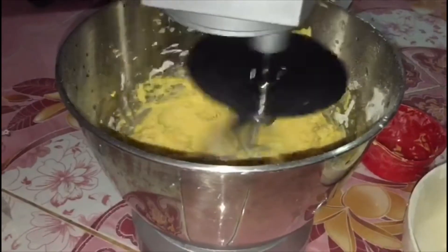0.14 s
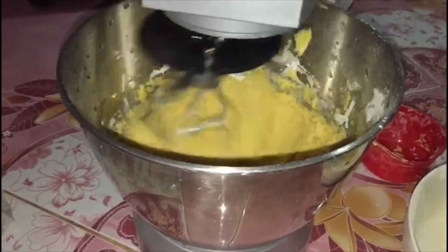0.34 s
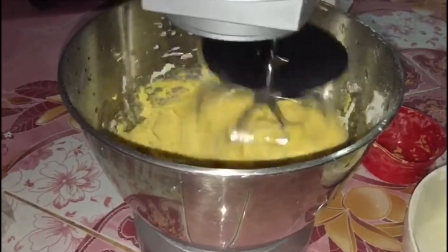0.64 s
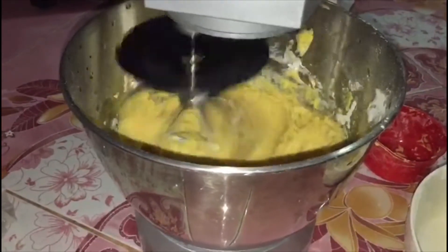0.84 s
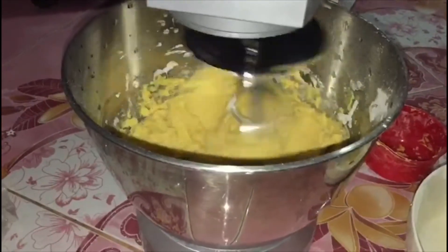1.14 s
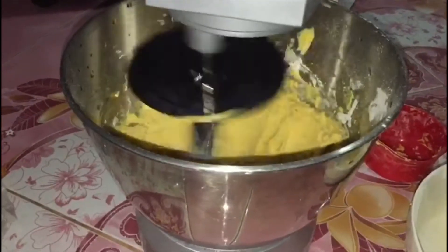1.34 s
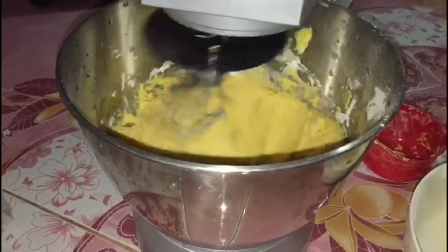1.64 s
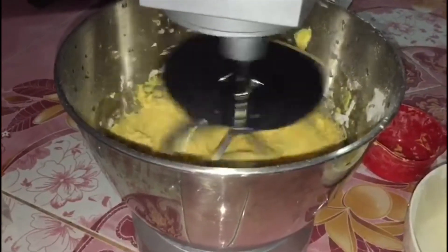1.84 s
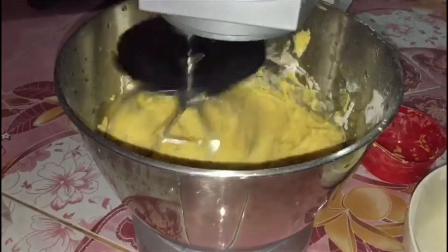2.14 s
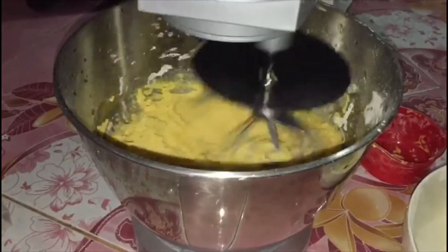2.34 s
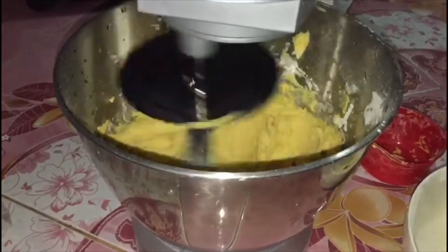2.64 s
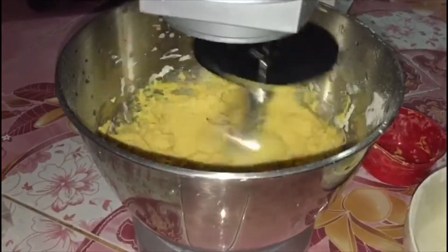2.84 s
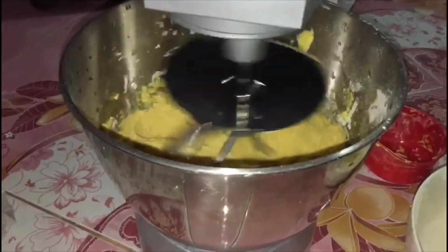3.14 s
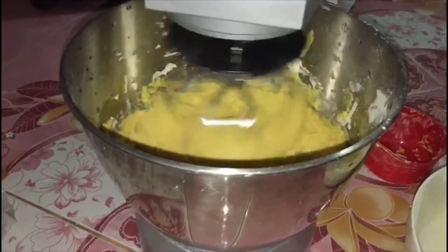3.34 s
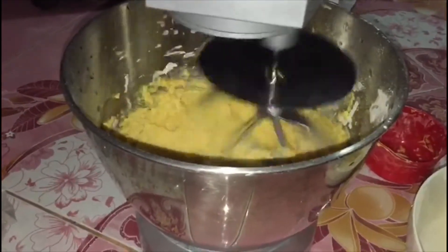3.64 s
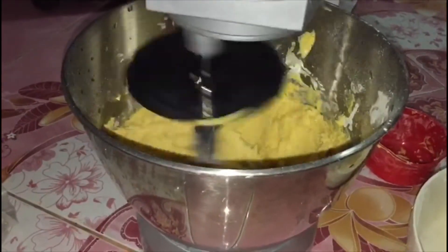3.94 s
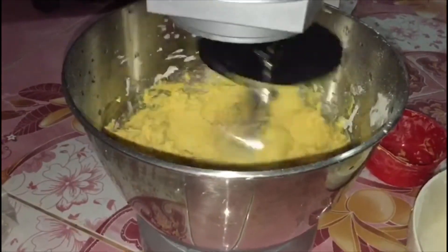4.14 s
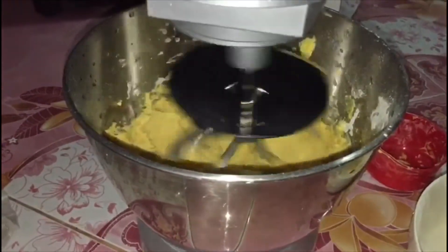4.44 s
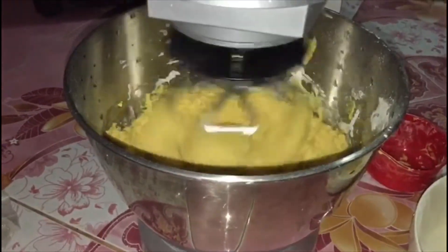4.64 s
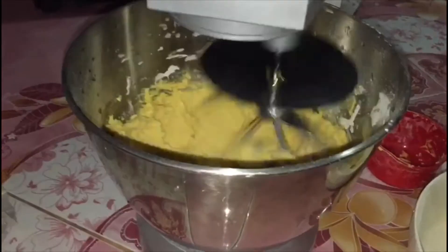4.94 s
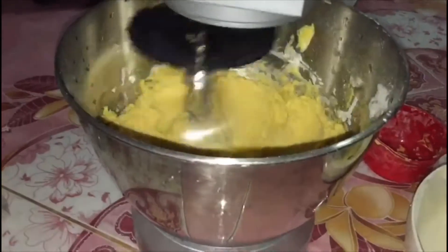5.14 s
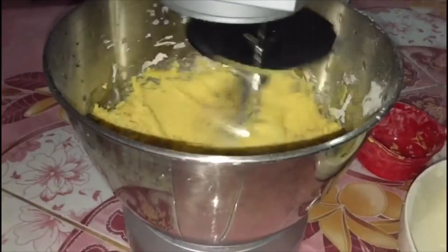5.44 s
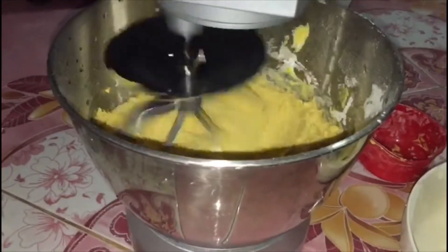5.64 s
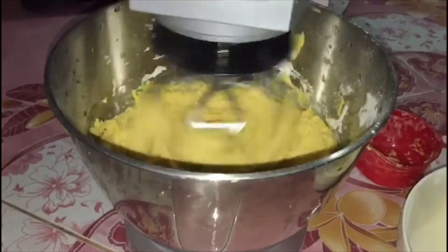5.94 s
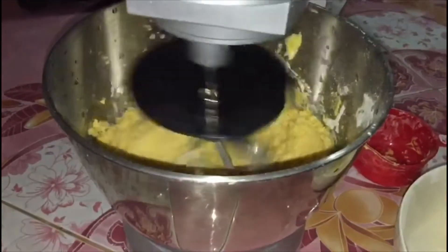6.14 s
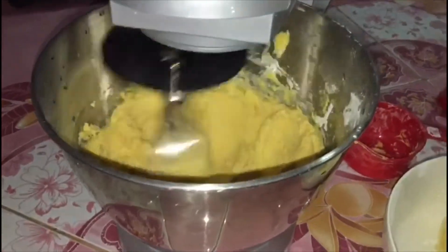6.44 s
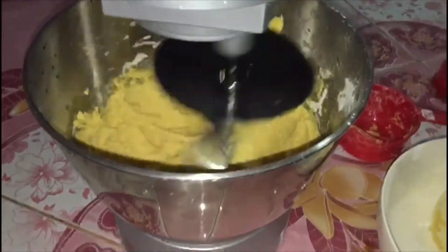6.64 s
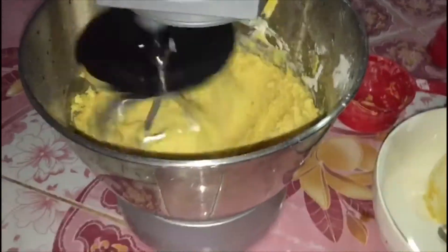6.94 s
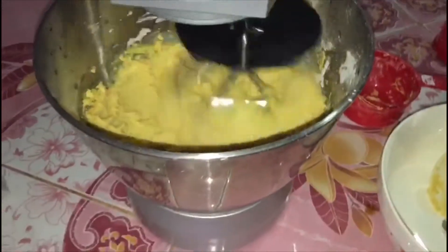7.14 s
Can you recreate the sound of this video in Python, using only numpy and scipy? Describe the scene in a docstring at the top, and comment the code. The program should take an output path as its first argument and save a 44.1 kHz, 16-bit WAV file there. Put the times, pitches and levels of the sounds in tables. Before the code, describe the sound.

Close up in a kitchen, a stand mixer beats dough with a wavering motor whine, gear chatter and pulsing hiss.

```python
"""A stand mixer works soft dough in a steel bowl, heard close up in a kitchen. Its motor whines at multiples of
the shaft speed and creeps faster; its armature and gears rattle the housing and bowl. Brushes and fan hiss,
swelling with each spin of the beater and each orbit (its trip round the bowl). The dough smacks faintly, the
table rumbles, and now and then one tone flares with a metallic ring."""
import sys
import numpy as np
from scipy import signal
from scipy.fft import rfft, irfft, next_fast_len
from scipy.io import wavfile

SR = 44100
rng = np.random.default_rng(int(sys.argv[2]) if len(sys.argv) > 2 else 0)


def waveform_to_disk(signal):
    """Save audio, clipped to [-1, 1], as 16-bit WAV at the path in sys.argv[1]."""
    frames = np.transpose(np.atleast_2d(signal))
    scaled = np.clip(frames, -1, 1) * 32767
    samples = np.round(scaled).astype(np.int16)
    wavfile.write(sys.argv[1], SR, samples)


N = 321930
TIME = np.arange(N) / SR  # seconds
GEAR_RATIO, SPIN_RATIO, ORBIT_RATIO = 0.30585, 0.0678, 0.01202  # turns per turn of the motor shaft


def gain(db):
    """Turn decibels into a number to multiply by."""
    return np.exp(np.asarray(db) * (np.log(10) / 20))


def set_level(x, db):
    """Scale a sound to this average (rms) level."""
    return x * gain(db) / np.sqrt(np.mean(x ** 2))


def wander(rate_hz, size=1024):
    """A smooth random curve, typically 1 away from zero, that changes about rate_hz times a second."""
    hz = np.arange(size) * SR / N
    spectrum = rng.standard_normal(size) + 1j * rng.standard_normal(size)
    slow = set_level(irfft(spectrum / (1 + (hz / rate_hz) ** 2), 10 * size), 0)
    return np.interp(np.linspace(0, len(slow), N), np.arange(len(slow)), slow)


def swing(turns, peak_at):
    """A wave between -1 and 1, highest at this fraction of every turn."""
    return np.cos(2 * np.pi * (turns - peak_at))


def tone(turns, db, flutter_db, wobble_rad, rate_hz):
    """One pure tone; looseness in the gears shakes its level and its timing."""
    angle = 2 * np.pi * (turns + rng.random()) + wobble_rad * wander(rate_hz)
    flutter = gain(flutter_db * wander(rate_hz))
    return set_level(flutter * np.sin(angle), 0) * gain(db)


def resonate(x, spectrum, resonances=()):
    """Pass a sound through an object that favours some frequencies and rings at its resonances."""
    size = 2 * next_fast_len(N // 2 + SR // 4)
    hz = np.maximum(np.arange(size // 2 + 1) * SR / size, 1)
    points_hz, points_db = np.transpose(spectrum)
    db = np.interp(np.log(hz), np.log(points_hz), points_db)
    for centre, width, boost in resonances:
        db = db + boost / (1 + (2 * (hz - centre) / width) ** 2)
    # fold the filter so that the ringing comes after each push, never before it
    cepstrum = irfft(db * np.log(10) / 20)
    cepstrum[1:size // 2] *= 2
    cepstrum[size // 2 + 1:] = 0
    return irfft(rfft(x, size) * np.exp(rfft(cepstrum)))[:N]


def kitchen_echoes(x, echo_db, fade_s=0.17, count=60):
    """Table, walls and cupboards send back quick echoes; later ones tend to be weaker."""
    distance, strength = rng.random((count, 2)).T
    delay_s = 0.002 + 0.06 * distance ** 2
    strength = (2 * strength - 1) * np.exp(-np.log(1000) * delay_s / fade_s)
    echoes = np.bincount((delay_s * SR).astype(int), strength / np.linalg.norm(strength))
    return x + gain(echo_db) * signal.fftconvolve(x, echoes)[:N]


def dough_load(shaft):
    """Dough gathers on the beater and lets go about every 1.5 s: -1 is slack, 1 the hardest pull."""
    return swing(0.0035 * shaft, peak_at=0.22)


# How fast the motor runs: (time [s], speed [turns per second])
SHAFT_SPEED = [(0, 190.9), (0.55, 191.6), (0.8, 191.2), (2.35, 192.7), (2.65, 192.2), (3.8, 193.1),
               (4.15, 193.9), (4.95, 192.5), (5.45, 193.6), (6.1, 193.1), (6.7, 193.5), (7.3, 193.4)]

def motor_shaft():
    """The shaft's speed and its count of turns so far, which trembles under the load."""
    times, speeds = np.transpose(SHAFT_SPEED)
    speed_hz = np.interp(TIME, times, speeds)
    return speed_hz, np.cumsum(speed_hz) / SR + 0.014 * wander(2.9)


# Tones that follow the work; a negative load swing means louder when the dough is slack:
# (shaft multiple, base level [dB], growth [dB/s], change as the microphone drifts [dB],
#  load swing [dB], press swing [dB], orbit swing [dB], orbit peak [turns],
#  spin swing [dB], spin peak [turns], flutter [dB], wobble [radians])
WORKING_TONES = [(2, -38.5, 0, -2.5, 4, -0.5, 1.5, 0.17, 1.2, 0.55, -1, 0.094),
                 (4, -23.5, 0, 0, 1.5, 1.1, 0.35, .76, 2.1, 0.58, 0.93, .2),
                 (5, -27, 0, 0.5, 0, -0.5, 1, 0.82, 3.5, 0.16, 1.5, 0.3),
                 (6, -25, -0.17, -2.5, 1.5, 0, 1.5, .26, 1.9, 0.88, 0.85, 0.25),
                 (7, -34.5, -1.4, 6, -3, 0.5, 0.5, 0.5, 2, 0.65, 2, 0.38),
                 (9, -25, 0.3, -6, -0.1, 0.5, 0.4, .11, 1.4, 0.68, 1.6, 0.38),
                 (10, -31, .5, -3, 1, 0.5, 0.2, .12, 0.7, 0.96, 3, 0.23),
                 (11, -28.5, 0.82, 3.5, 0, 0, 0.7, 0.86, .9, 0.4, .5, .1),
                 (12, -34.2, 0.2, 0.5, -4.3, 2.2, 0.5, .23, 3.5, 0.14, 4, 0.49)]

def working_whine(shaft, flaring_multiple=9):
    """Motor tones swell as the beater works; their balance shifts late on as the microphone drifts."""
    orbit, spin = ORBIT_RATIO * shaft, SPIN_RATIO * shaft
    load = dough_load(shaft)
    press = swing(2 * orbit, peak_at=0.93)  # the beater presses hardest twice an orbit
    drift = np.interp(TIME, [5.8, 7.0], [0, 1])
    out = 0
    for (multiple, db, growth, drift_db, load_db, press_db,
         orbit_db, orbit_peak, spin_db, spin_peak, flutter_db, wobble_rad) in WORKING_TONES:
        db = db + growth * (TIME - TIME.mean()) + drift_db * drift
        db = db + load_db * load + press_db * press
        db = db + orbit_db * swing(orbit, orbit_peak) + spin_db * swing(spin, spin_peak)
        if multiple == flaring_multiple:
            db = np.maximum(db, metallic_flares_db())
        out = out + tone(multiple * shaft, db, flutter_db, wobble_rad, rate_hz=21)
    return out


# The steadier motor tones: (shaft multiple, level [dB])
STEADY_TONES = [(3, -31.5), (8, -33.5), (13, -39), (14, -39), (15, -38), (16, -49.5), (17, -44.5),
                (18, -41)]

def steady_whine(shaft):
    """Motor tones at whole multiples of the shaft speed that flutter but do not swell with the work."""
    return sum(tone(multiple * shaft, db, flutter_db=2.5, wobble_rad=0.31, rate_hz=28)
               for multiple, db in STEADY_TONES)


# Tones added by the first gear: (shaft multiple, side [+1 above, -1 below], level [dB])
GEAR_TONES = [(5, -1, -33.5), (5, 1, -39), (6, 1, -46), (8, 1, -34.5), (11, -1, -53), (11, 1, -31.5),
              (12, 1, -33.5), (13, 1, -37), (14, -1, -33.5)]

def gear_whine(shaft):
    """The first gear adds tones above or below shaft multiples, set apart by its own turning speed."""
    return sum(tone((multiple + side * GEAR_RATIO) * shaft, db, flutter_db=2.5, wobble_rad=0.52, rate_hz=7.6)
               for multiple, side, db in GEAR_TONES)


def rotor_hum(shaft):
    """The off-balance rotor hums: it swells once an orbit, eases under load and throbs with the spin."""
    rotor = tone(shaft, -36, flutter_db=1.7, wobble_rad=0.36, rate_hz=10.5)
    # a second tone, slightly higher, throbs against the first
    neighbour = tone((1 + SPIN_RATIO) * shaft, -44, flutter_db=1.5, wobble_rad=0.2, rate_hz=6)
    swell_db = 3.5 * swing(ORBIT_RATIO * shaft, peak_at=0.37) - dough_load(shaft)
    return (rotor + neighbour) * gain(swell_db)


# Armature and gear noise heard through the housing: (frequency [Hz], relative level [dB])
CHATTER_SPECTRUM = [(100, -46), (160, -17.5), (190, -3), (300, -3.5), (420, -7), (490, -12), (620, -3.5),
                    (850, -6), (1050, 2), (1330, -3.5), (2300, -3), (2800, -11.5), (3400, -8),
                    (5000, -36.5)]
# Where housing and bowl ring; a negative boost is a dip: (frequency [Hz], width [Hz], boost [dB])
BODY_RESONANCES = [(287, 29, 4), (759.4, 27, 5.5), (1176, 35, 5), (1450, 90, 2), (1709, 40, 8.5),
                   (2000, 40, 4.5), (2160, 120, 3.5), (2323, 37, 6), (2610, 152, 8.5), (3067, 48, 6.5),
                   (3150, 147, 6), (4095, 87, 6), (4260, 71, -3.5), (4450, 200, 4.5), (5293, 160, 7),
                   (6220, 260, 3.5), (6860, 200, 2), (7070, 66, 5), (8070, 200, -2.5), (8230, 120, 1),
                   (10130, 250, 5.5)]

def housing_chatter(shaft):
    """Armature pulses twice a shaft turn, harder once a gear turn, ring the housing and bowl."""
    bite_db = 2.3 * swing(2 * shaft, peak_at=0)
    gear_db = 0.71 * swing(GEAR_RATIO * shaft, peak_at=0.88)
    spin_db = 0.5 * swing(SPIN_RATIO * shaft, peak_at=0.89)
    teeth = rng.standard_normal(N) * gain(bite_db + gear_db + spin_db + 0.86 * wander(9.5))
    ringing = resonate(teeth, CHATTER_SPECTRUM, BODY_RESONANCES)
    return set_level(kitchen_echoes(ringing, echo_db=-10.5), -18.5)


# The hiss of the motor's brushes and fan: (frequency [Hz], relative level [dB])
HISS_SPECTRUM = [(1500, -17.5), (3000, 1.5), (3900, 2), (4600, 0.5), (4950, -3), (5700, -1.5), (6600, -2.5),
                 (7900, -4.5), (8700, -3), (9900, -8), (10400, -14.5), (11200, -6.5), (12000, -17)]

def brush_and_fan_hiss(shaft):
    """Brushes, fan and rubbing make a grainy hiss that throbs with the beater's spin and orbit."""
    orbit = ORBIT_RATIO * shaft
    spin_db = 0.95 * swing(SPIN_RATIO * shaft, peak_at=0.47)
    gear_db = 0.41 * swing(GEAR_RATIO * shaft, peak_at=0)
    orbit_db = 0.47 * swing(orbit, peak_at=0.77) + 0.49 * swing(2 * orbit, peak_at=0.73)
    grain_db = 1.7 * rng.standard_normal(N) + 0.99 * wander(36)
    rush = rng.standard_normal(N) * gain(spin_db + gear_db + orbit_db + grain_db)
    ringing = resonate(rush, HISS_SPECTRUM, BODY_RESONANCES)
    return set_level(kitchen_echoes(ringing, echo_db=-9.5), -26.5)


# Thin metallic notes in the hiss: (frequency [Hz], width [Hz], base level [dB])
METAL_NOTES = [(5330, 69, -40.5), (6375, 50, -44.8)]

def metal_shimmer(shaft):
    """Rubbing keeps two high notes of the metal flickering, most at one point of the orbit."""
    orbit_db = 2 * swing(ORBIT_RATIO * shaft, peak_at=0)
    out = 0
    for hz, width, db in METAL_NOTES:
        note = signal.lfilter(*signal.iirpeak(hz, hz / width, fs=SR), rng.standard_normal(N))
        out = out + set_level(note * gain(2 * wander(13) + orbit_db), db)
    return out


def dough_smacks(shaft, per_second=90, scatter_db=3):
    """Sticky dough tears off the beater in tiny smacks, mostly at one point of its spin."""
    chance = per_second / SR * (1 + swing(SPIN_RATIO * shaft, peak_at=0.44))
    starts = rng.random(N) < chance
    strength = gain(scatter_db * np.clip(rng.standard_normal(N), -2, 2))
    t = np.arange(SR // 20) / SR
    tear = rng.standard_normal(len(t)) * np.exp(-t / 0.0018)
    smacks = signal.fftconvolve(starts * strength, tear)[:N]
    return set_level(resonate(smacks, HISS_SPECTRUM, BODY_RESONANCES), -42.5)


# The low shaking of the table: (frequency [Hz], relative level [dB])
RUMBLE_SPECTRUM = [(27, -30), (37, -17), (45, -2), (60, 5.5), (76, -7), (95, 2.5), (150, 3.5), (200, -1),
                   (400, -22)]

def table_rumble():
    """The mixer sends a low, even rumble through the table."""
    return set_level(resonate(rng.standard_normal(N), RUMBLE_SPECTRUM), -48)


# Short metallic bursts in the whine: (time [s], peak level [dB])
FLARE_PEAKS = [(0.99, -16), (1.11, -18), (1.29, -18), (1.375, -17), (2.61, -18), (2.8, -18), (3.86, -16),
               (4.35, -18), (5.42, -14.5)]

def metallic_flares_db(width_s=0.014):
    """The level of the ninth shaft multiple's brief flares; that tone sits on a resonance."""
    bursts = [db - 10 * np.log10(np.e) * ((TIME - peak_s) / width_s) ** 2 for peak_s, db in FLARE_PEAKS]
    return np.max(bursts, axis=0)


def scene():
    """One shaft drives the mixer's noises and tones over the rumble; left and right are the same."""
    speed_hz, shaft = motor_shaft()
    noises = housing_chatter(shaft) + brush_and_fan_hiss(shaft) + metal_shimmer(shaft) + dough_smacks(shaft)
    noises *= gain(0.2 * (speed_hz - speed_hz.mean()))  # faster is louder
    rumble = table_rumble()
    tones = working_whine(shaft) + steady_whine(shaft) + gear_whine(shaft) + rotor_hum(shaft)
    mono = tones + noises + rumble
    return np.array([mono, mono])


def record(dry):
    """Cut the treble steeply above 11800 Hz."""
    return signal.sosfilt(signal.ellip(12, 0.1, 90, 11800, fs=SR, output="sos"), dry)


dry = scene()
out = record(dry)
waveform_to_disk(out)
```